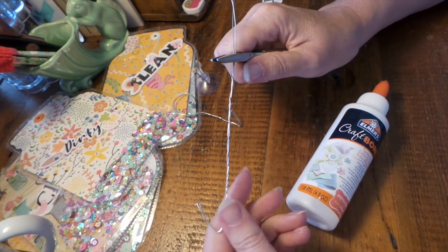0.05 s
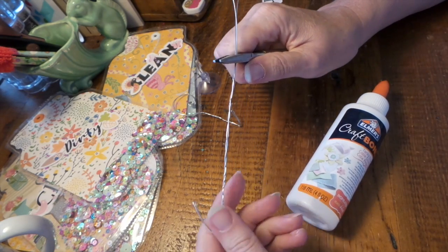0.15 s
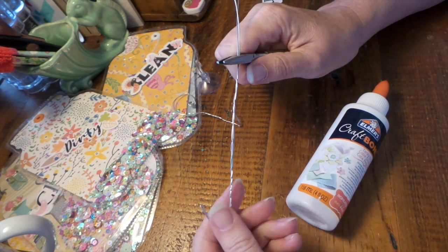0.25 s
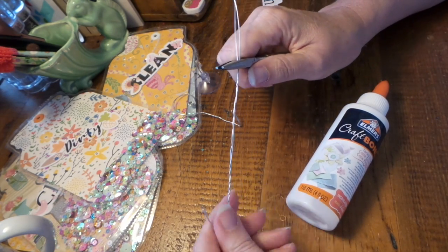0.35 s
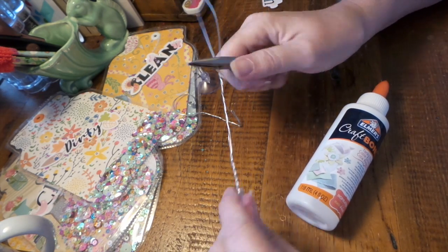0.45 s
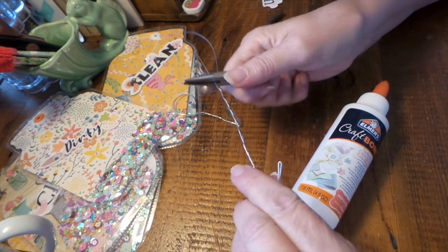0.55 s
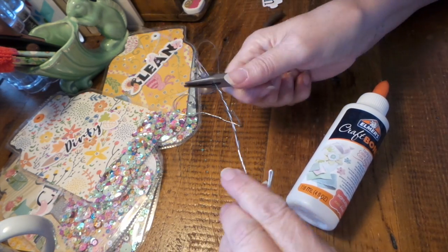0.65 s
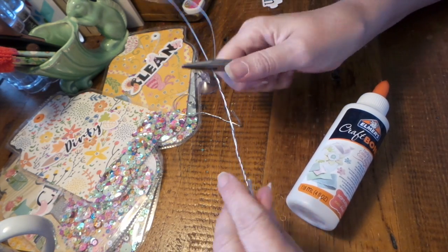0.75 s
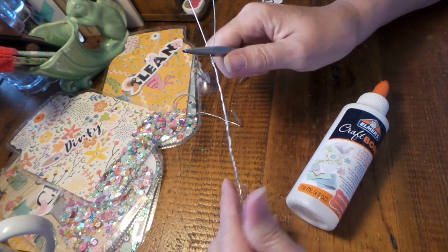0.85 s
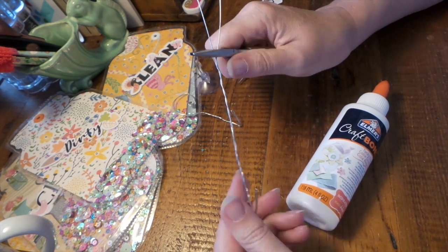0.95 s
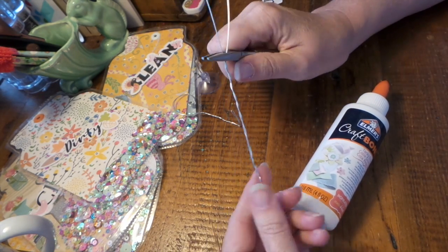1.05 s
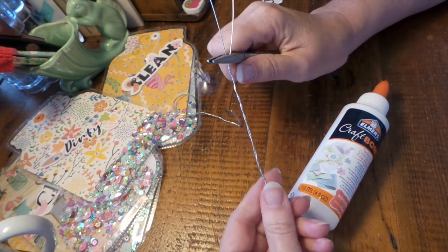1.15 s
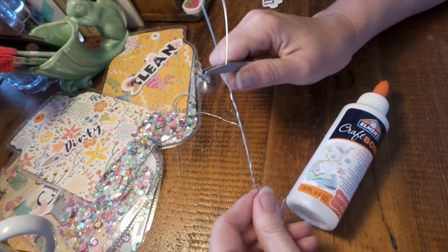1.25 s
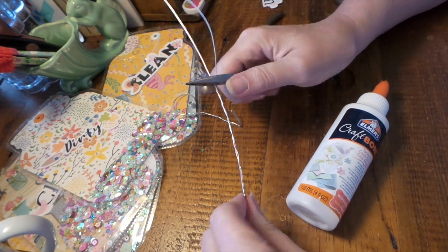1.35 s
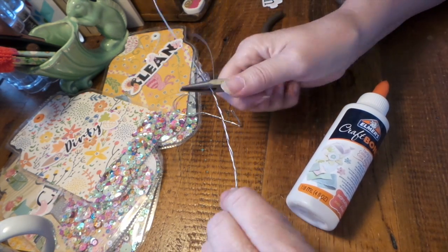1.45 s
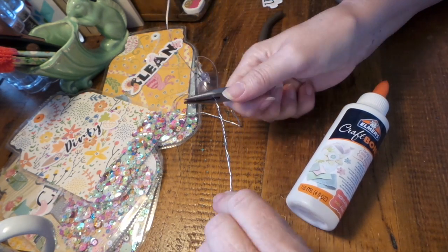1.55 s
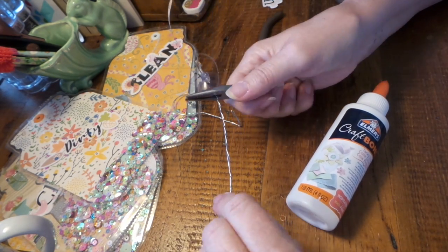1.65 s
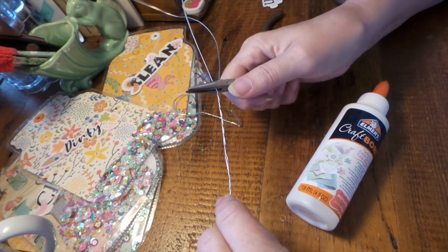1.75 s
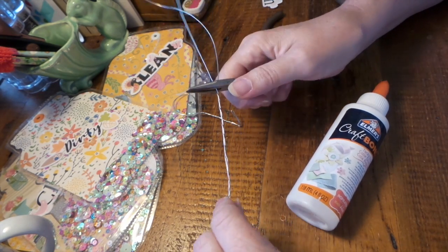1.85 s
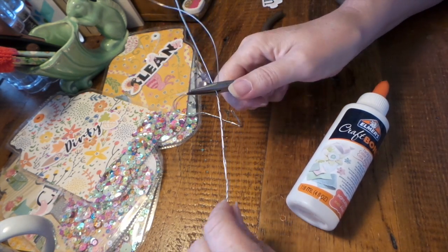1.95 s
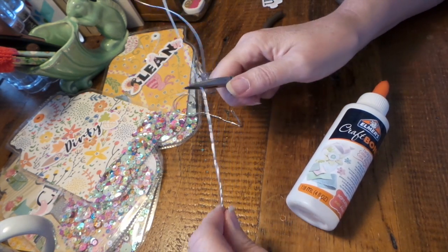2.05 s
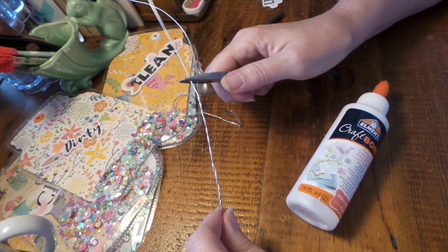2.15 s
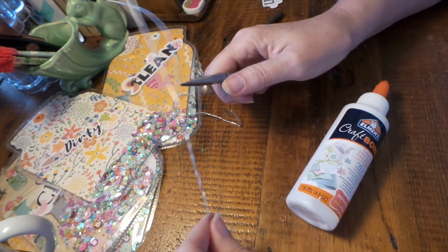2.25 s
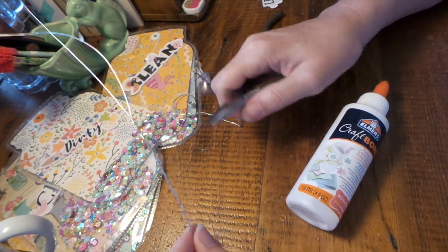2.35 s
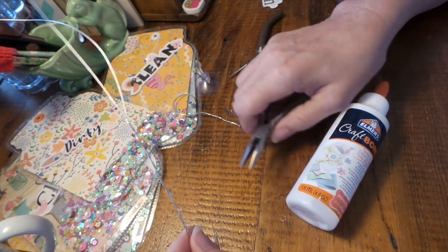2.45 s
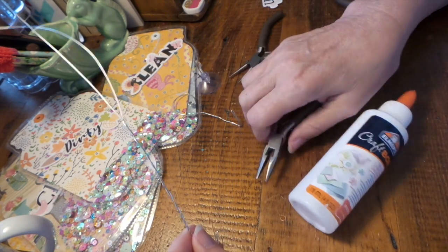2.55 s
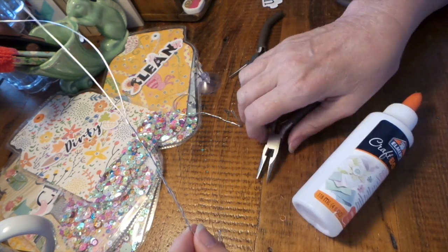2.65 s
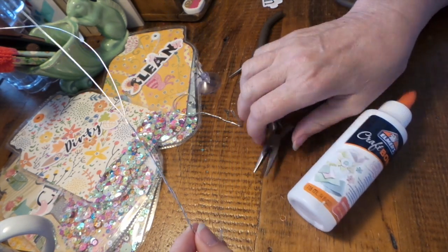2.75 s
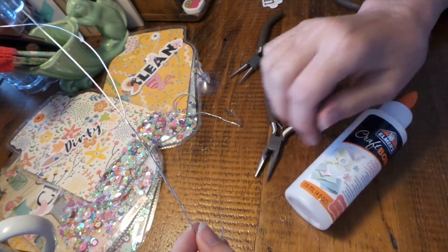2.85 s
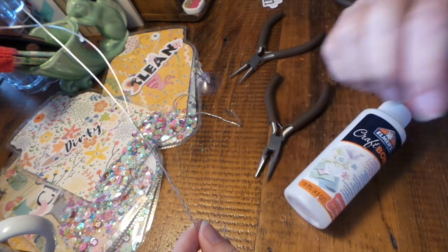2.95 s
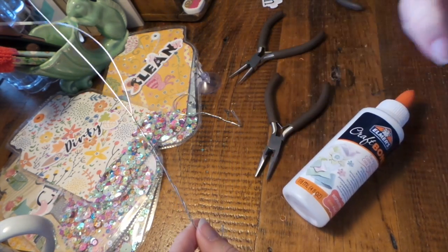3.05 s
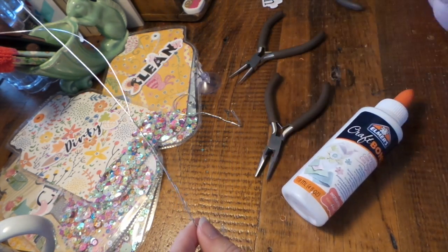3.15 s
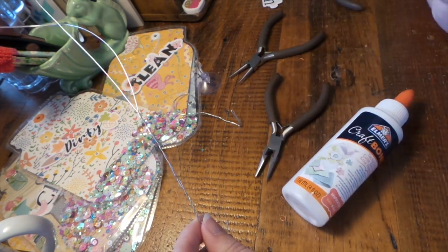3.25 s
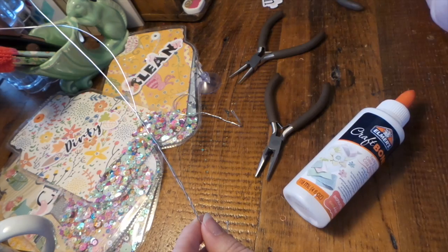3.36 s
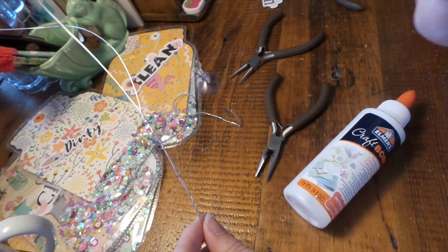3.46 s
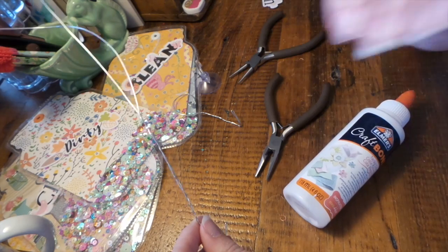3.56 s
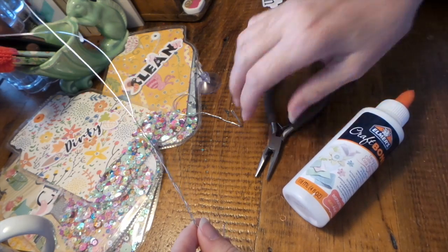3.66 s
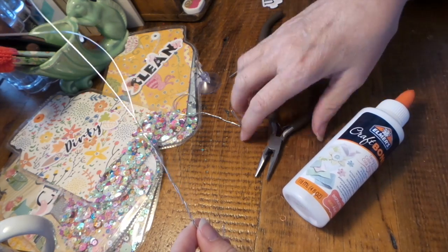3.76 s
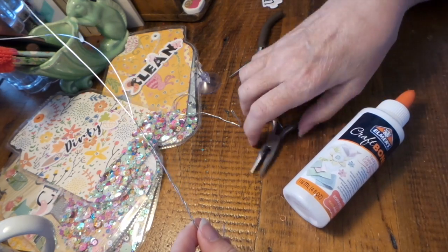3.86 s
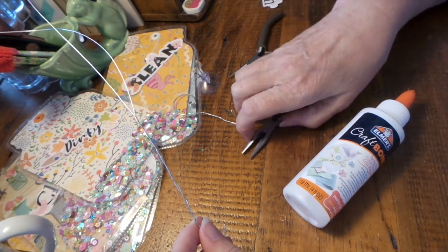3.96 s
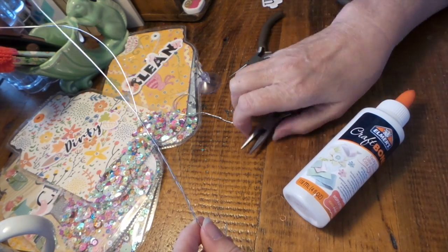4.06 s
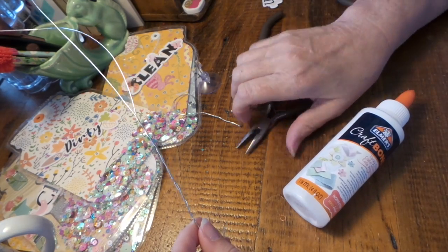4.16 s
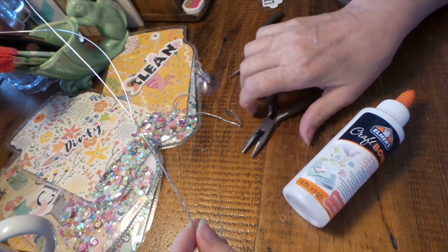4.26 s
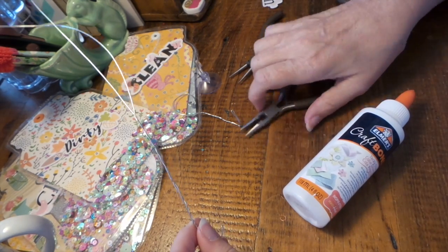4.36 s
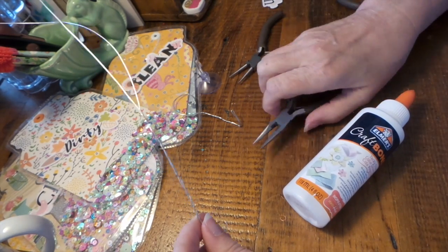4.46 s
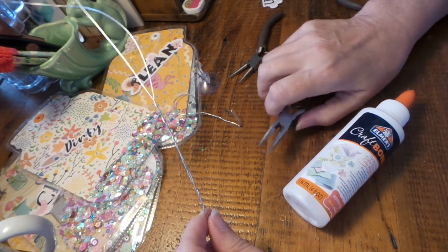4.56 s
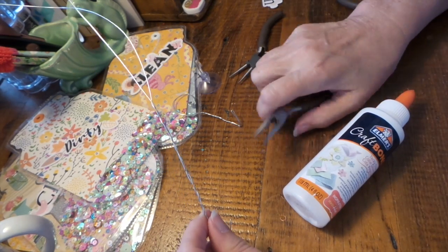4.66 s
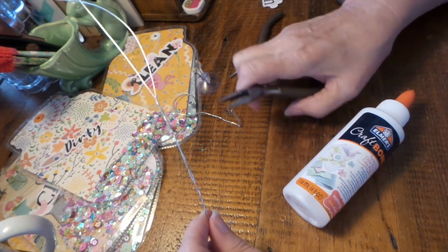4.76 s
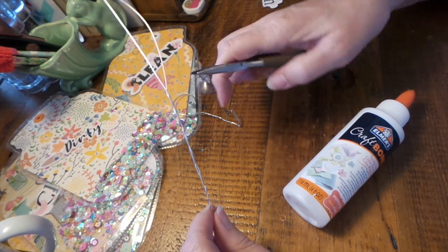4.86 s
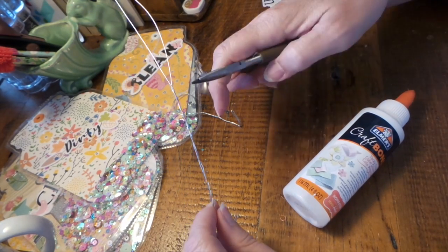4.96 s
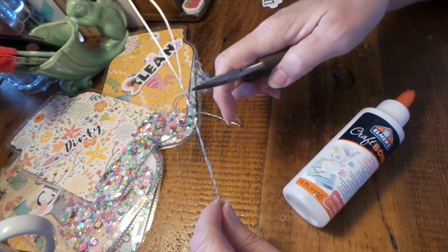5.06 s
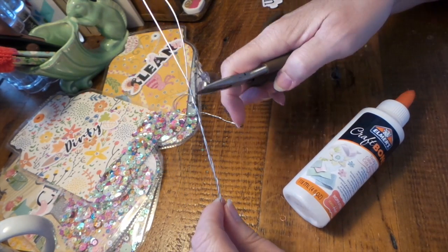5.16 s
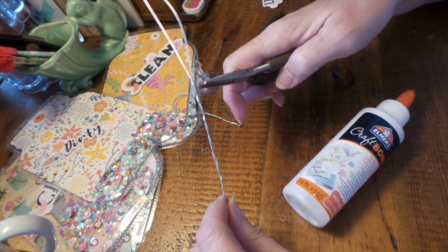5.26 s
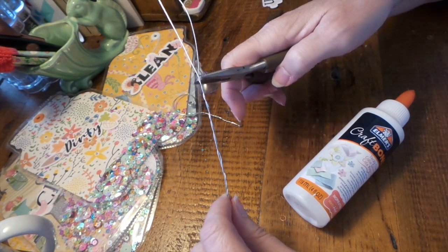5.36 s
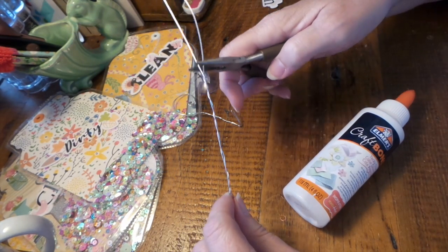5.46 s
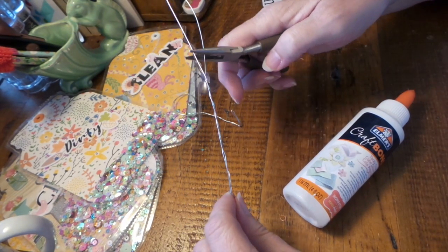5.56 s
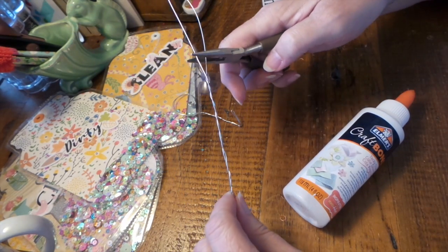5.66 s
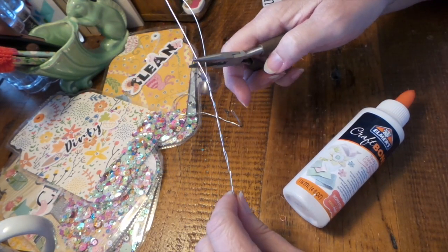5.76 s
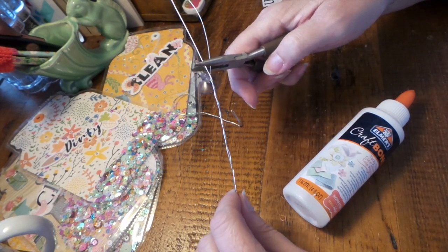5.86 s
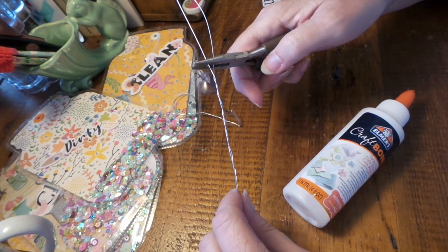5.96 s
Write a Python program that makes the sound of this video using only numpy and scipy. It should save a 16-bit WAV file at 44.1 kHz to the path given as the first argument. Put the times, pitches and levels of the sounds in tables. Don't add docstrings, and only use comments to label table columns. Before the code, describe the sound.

Close, quiet wire snaps and jaw clinks, then pliers drop hard on wood, rattle to rest, and get nudged and lifted again; an appliance hums behind.

```python
import sys
import numpy as np
from scipy import signal
from scipy.fft import rfft, irfft
from scipy.io import wavfile

SR = 44100
rng = np.random.default_rng(int(sys.argv[2]) if len(sys.argv) > 2 else 0)


def makeup_ratio(level_db):
    decades = np.asarray(level_db, float) / 20
    return 10 ** decades


def master_out(mix):
    frames = np.transpose(np.atleast_2d(mix))
    ceiling = np.clip(frames, -1, 1)
    pcm = np.round(ceiling * 32767).astype(np.int16)
    wavfile.write(sys.argv[1], SR, pcm)


N = 265482

# t/s, gain/dB
GAIN = [(0, -1), (.5, -0.5), (1.4, 0.5), (2.2, -1), (2.6, -1.5), (3.1, -1), (3.4, -5), (3.7, -4.5),
        (3.95, 3), (4.2, -2), (4.45, 0), (4.8, -5.5), (5.05, -5.5), (5.25, -3.5), (5.65, -1), (6.02, -3)]
# f/Hz, level/dB, t60/s
JAWS = [(4000, -15, 0.049), (5430, -20, 0.06), (6121, -2.5, 0.065), (6770, -15, 0.092), (8000, -17, .04),
        (9970, -2, 0.077), (9790, -17, 0.078), (11900, 6, 0.035), (12650, -17, 0.056), (12770, 9.5, 0.022),
        (13000, -20, 0.023), (14140, -1, 0.017)]
# f/Hz, level/dB, t60/s
TOP = [(602, 3, 0.056), (707, 4, 0.061), (870, -2.5, 0.025), (1017, -14.5, 0.17), (1022, -2, 0.095),
       (1110, -2, 0.08), (1320, -25, 0.015), (1440, -15, 0.019), (1610, -29, 0.04), (2000, -15, 0.035),
       (2550, -6, 0.018), (3070, -19, 0.053)]
# f/Hz, level/dB, t60/s
PLIERS = [(4150, -2, .02), (6620, -5, .012), (7590, -3, .012), (8500, 0, .01), (10100, -6, .01),
          (12600, -6, .008), (13800, -6, .008)]


def rms_one(x):
    return x / np.sqrt(np.mean(x ** 2) + 1e-20)


def butter(x, hz, kind, order=2):
    return signal.sosfilt(signal.butter(order, hz, kind, fs=SR, output="sos"), x)


def in_time(rows):
    return np.interp(np.arange(N) / SR, *np.transpose(rows))


def noise(response):
    return rms_one(irfft(rfft(rng.standard_normal(N)) * response, N))


def ring(push, modes):
    out = 0
    for k, (hz, level_db, t60) in enumerate(modes):
        radius = makeup_ratio(-60 / (t60 * SR))
        angle = 2 * np.pi * hz / SR
        poles = [1, -2 * radius * np.cos(angle), radius * radius]
        mode = signal.lfilter([0, np.sin(angle)], poles, push + 1e-18)
        out = out + (-1) ** k * makeup_ratio(level_db) * mode
    return out


def place(out, s, sound, peak_db):
    at = round(s * SR)
    sound = sound[:N - at]
    scaled = makeup_ratio(peak_db) * sound / np.max(np.abs(sound))
    return out + np.pad(scaled, (at, N - at - len(sound)))


def contact(length_s, first=-2.33):
    t = np.arange(8192) / SR
    chatter = rng.standard_normal(len(t)) * np.exp(-t / max(length_s, 2e-4))
    chatter[0] = first
    return chatter


def uneven(modes, spread_db=4):
    return [(hz, db + spread_db * rng.standard_normal(), t60) for hz, db, t60 in modes]


def background():
    # f/Hz, density/dB per Hz
    rumble_curve = [(20, -33), (86, -9), (119, -8), (273, -13), (386, -18.5), (701, -23), (2500, -44.5),
                    (3600, -85)]
    # f/Hz, density/dB per Hz
    hiss_curve = [(500, -13.5), (1500, 2), (4000, 0), (8000, -3), (12000, -3), (15000, -3.5), (16500, -15)]
    # f/Hz, width/Hz, rms/dB
    resonances = [(191, 70, -53), (388, 17, -60), (711, 10, -69)]
    gain_db = in_time(GAIN)
    hz = np.maximum(np.fft.rfftfreq(N, 1 / SR), 1)

    def shaped(curve):
        curve_hz, curve_db = np.transpose(curve)
        return noise(makeup_ratio(np.interp(np.log(hz), np.log(curve_hz), curve_db)))

    air = makeup_ratio(-45) * shaped(rumble_curve)
    for mid_hz, width_hz, level_db in resonances:
        air += makeup_ratio(level_db) * noise(1 / (1 + (2 * (hz - mid_hz) / width_hz) ** 2))
    return air * makeup_ratio(gain_db) + shaped(hiss_curve) * makeup_ratio(-59.5 + 0.75 * gain_db)


def appliance_drone():
    # f/Hz, pitch wander/Hz, flutter/dB
    tones = [(118, 7.01, 3.5), (270, 6.88, 4.5)]
    # t/s, level/dB
    load = [(0, -37.5), (.2, -47.5), (.42, -37.5), (.6, -58), (.68, -43), (1.3, -47.5), (1.63, -41),
            (1.8, -58), (1.9, -42), (2.1, -48), (2.27, -44), (2.48, -58), (2.6, -46), (3.05, -48),
            (3.5, -52.5), (4.7, -46), (5, -58), (5.15, -46)]
    levels_db = in_time(load), -49.5 + in_time(GAIN)
    out = 0
    for (mid_hz, wander_hz, flutter_db), level_db in zip(tones, levels_db):
        wander = rms_one(butter(rng.standard_normal(N), 14.34, "low"))
        flutter = rms_one(butter(rng.standard_normal(N), 9.5, "low"))
        flutter = np.clip(flutter, -3, 1.3)
        phase = 2 * np.pi * np.cumsum(mid_hz + wander_hz * wander) / SR
        out = out + np.sqrt(2) * makeup_ratio(level_db + flutter_db * flutter) * np.sin(phase)
    return out


def room(x):
    t60_s, level_db, dull_hz = 0.3, -12.5, 3000
    t = np.arange(SR // 2) / SR
    dull, bright = rng.standard_normal((2, len(t)))
    tail = butter(dull, dull_hz, "low") * makeup_ratio(-60 * t / t60_s)
    tail += 0.93 * bright * makeup_ratio(-60 * t / (.5 * t60_s))
    tail *= 1 - np.exp(-t / 0.0031)
    return makeup_ratio(level_db) * signal.fftconvolve(x, tail / np.sqrt(np.sum(tail ** 2)))[:N]


def knocks(rows, top_hz=17000):
    # f/Hz, level/dB, t60/s
    board = [(118, 2, 0.068), (160, 1.5, 0.065), (253, 2, 0.091), (276.5, 8, 0.041), (375.6, -5.5, 0.046),
             (443, 1, 0.071), (526, -9, 0.087)]
    out, touch = np.zeros(N), -signal.unit_impulse(8192)
    for s, thud_db, thud_hz, knock_db, knock_hz, crack_db in rows:
        thud = ring(touch, [(thud_hz, 0, 3.36 / thud_hz)])
        thud += 0.11 * ring(touch, uneven(board))
        out = place(out, s, thud, thud_db)
        knock = ring(touch, [(knock_hz, 0, 5.5 / knock_hz)])
        knock += 0.088 * ring(touch, uneven(TOP))
        rattle = butter(contact(0.0065), [.5 * knock_hz, 1.54 * knock_hz], "band")
        out = place(out, s, knock + 1.29 * rattle, knock_db)
        push = contact(0.0037)
        crack = butter(push, [3000, top_hz], "band") + 0.015 * ring(push, PLIERS)
        out = place(out, s, crack, crack_db)
    return out


def light_taps():
    # t/s, knock/dB, knock f/Hz, crack/dB
    taps = [(0.031, -35, 1120, -44), (0.258, -40.5, 820, -53), (0.44, -38, 884, -57), (0.91, -36, 900, -54),
            (1.802, -37, 1000, -47), (1.951, -43, 1200, -50), (2.213, -39, 810, -60),
            (3.099, -41, 1040, -41.5), (3.118, -38.5, 1010, -51), (3.2, -42.5, 1280, -46),
            (3.236, -38, 1180, -61), (3.252, -34.5, 1200, -60), (3.297, -61, 1240, -55),
            (3.432, -29, 1600, -38), (3.565, -41.5, 800, -62), (3.6322, -26, 1270, -34),
            (3.744, -22.5, 800, -66), (4.4082, -37, 1290, -37), (4.526, -37.5, 1360, -43),
            (4.56, -41, 1460, -53), (4.779, -51, 1100, -50.5), (5.352, -34.5, 1080, -59),
            (5.011, -43.5, 1100, -56), (5.33, -43, 1200, -58), (5.604, -46.5, 2600, -46),
            (5.665, -41.5, 1300, -53)]
    thud_hz, thud_db = 280, -15
    rows = [(s, db + thud_db, thud_hz, db, hz, crack_db) for s, db, hz, crack_db in taps]
    return knocks(rows, top_hz=8000)


def blows(rows, thud_hz, knock_hz, sag_per_s=0):
    pitched = []
    for s, thud_db, knock_db, crack_db in rows:
        sag = np.exp(-sag_per_s * (s - rows[0][0]))
        pitched.append((s, thud_db, thud_hz * sag, knock_db, knock_hz * sag, crack_db))
    return knocks(pitched)


def pliers_on_table():
    # t/s, thud/dB, knock/dB, crack/dB
    drop = [(2.7762, -8, -20, -6), (2.82, -26, -19.5, -17), (2.8333, -6.5, 0, -8), (2.838, -18, -38, -13),
            (2.848, -5, -4, -12.5), (2.8495, -3, -35, -27), (2.8635, -18, -30, -28), (2.875, -28, -8, -15),
            (2.895, -40, -41, -25), (2.9105, -3, -28, -17), (2.9155, -17, -10, -35),
            (2.94, -25, -20.5, -27), (2.9515, -7.5, -30, -18.5), (2.968, -40, -16.5, -20),
            (2.982, -44, -32, -25)]
    # t/s, thud/dB, knock/dB, crack/dB
    landing = [
        (3.8163, -5.5, -19.5, -16),
        (3.8255, -11, -15, -17.5),
        (3.856, -37, -26, -27.5),
        (3.952, -20, -28.5, -41),
    ]
    # t/s, thud/dB, knock/dB, crack/dB
    pickup = [
        (4.0385, -6, -6, -9.5),
        (4.0595, -13.5, -16, -14),
        (4.071, -36, -25, -23),
        (4.252, -10.5, -7.5, -9),
        (4.27, -19.5, -14, -42),
        (4.31, -26, -17.5, -21),
        (4.3145, -12, -15.5, -15.5),
        (4.33, -23, -42, -24),
        (4.45, -27, -37, -58),
    ]
    out = blows(drop, thud_hz=367, knock_hz=1180, sag_per_s=1.72)
    out += blows(landing, thud_hz=270, knock_hz=1000)
    return out + blows(pickup, thud_hz=294, knock_hz=1320)


def sway_and_clank():
    # t/s, level/dB, f/Hz, t60/s
    rings = [(2.836, -19, 118, 0.14), (2.95, -27, 118, 0.41), (3.824, -13.5, 118, 0.14),
             (2.778, -11, 2000, 0.0065), (2.911, -34.5, 4170, 0.057), (2.942, -34, 4170, .05),
             (2.969, -39, 4360, 0.039), (4.038, -11, 3000, 0.011), (4.041, -11, 4200, 0.0068),
             (4.06, -9.5, 2500, 0.0094), (4.2519, -1, 1480, 0.0085), (4.253, -15, 1060, 0.026),
             (4.315, -10.5, 2450, 0.0067)]
    out, touch = np.zeros(N), -signal.unit_impulse(8192)
    for s, ring_db, ring_hz, t60 in rings:
        soft_touch = butter(touch, 2 * ring_hz, "low")
        out = place(out, s, ring(soft_touch, [(ring_hz, 0, t60)]), ring_db)
    return out


def scrapes(strokes, body, low_hz, shift=0.036, uneven_db=3, bright_db=-30, top_hz=19000):
    out = np.zeros(N)
    for s, length_s, crest, hiss_db, ring_db in strokes:
        at, n = round(s * SR), round(length_s * SR)
        slips = rng.standard_normal(16384) * makeup_ratio(2.1 * np.minimum(rng.exponential(1, 16384), 6))
        slips *= makeup_ratio(2.03 * rms_one(butter(rng.standard_normal(16384), 100, "low")))
        grip = rng.standard_normal((len(body), 2))
        modes = [(hz * (1 + shift * a), db + uneven_db * b, t60) for (hz, db, t60), (a, b) in zip(body, grip)]
        stroke = np.interp(np.linspace(0, 1, n), [0, np.clip(crest, .02, .98), 1], [0, 1, 0])
        stroke = stroke ** 1.2
        hiss = butter(butter(slips, low_hz, "high", order=3), top_hz, "low")
        hiss = rms_one(hiss + makeup_ratio(bright_db) * butter(hiss, 9000, "high"))
        rub = makeup_ratio(hiss_db) * hiss + makeup_ratio(ring_db) * rms_one(ring(slips, modes))
        out[at:at + n] += stroke * rub[2000:2000 + n]
    return out


def table_rubs():
    # t/s, length/s, moment of most pressure/0-1, hiss/dB, ring/dB
    slides = [(2.73, .016, .41, -62, -66), (2.83, 0.089, .2, -37, -47), (2.89, 0.12, 0.13, -41, -36),
              (3.82, 0.29, 0.22, -45.5, -68), (3.91, 0.041, 0.59, -29.5, -34.5),
              (4.04, 0.073, 0.24, -42, -50), (4.255, 0.075, .17, -41, -38),
              (4.305, 0.048, 0.37, -34.5, -36), (4.07, 0.21, .05, -54, -68), (4.35, 0.32, .05, -54, -71)]
    # t/s, length/s, moment of most pressure/0-1, hiss/dB, ring/dB
    chatters = [(2.834, 0.078, 0.32, -42, -22), (2.91, 0.12, 0, -44, -30), (3.90, 0.073, 0.35, -37.5, -37),
                (4.04, 0.057, 0.23, -28.5, -33), (4.254, 0.056, .1, -29, -26), (4.31, 0.056, 0, -41, -33),
                (3.18, .15, 0.02, -77, -56), (4.38, .31, 0, -68, -50.5), (5.32, 0.13, 0.4, -62, -67)]
    pressed_top = [(hz, db, t60 / 5) for hz, db, t60 in TOP]
    out = scrapes(slides, PLIERS, low_hz=2000, shift=0.034)
    return out + scrapes(chatters, pressed_top, low_hz=900, shift=0.086, uneven_db=1.5, top_hz=3000)


def jaw_clinks():
    # t/s, peak/dB
    clinks = [
        (0.621, -30.5),
        (0.729, -29),
        (0.8637, -15.5),
        (5.5994, -43),
        (5.67, -41),
    ]
    out = np.zeros(N)
    for s, peak_db in clinks:
        push = contact(0.00024, first=-4.0)
        out = place(out, s, ring(push, JAWS) + 1.5 * butter(push, 9000, "high"), peak_db)
    return out


def wire_ticks():
    # t/s, crack/dB, low part/dB, contact length/s, rustle/dB
    snaps = [(0.7513, -29, -29.5, 0.00035, -22.5), (0.754, -53, -39, 0.00067, -54),
             (1.2, -52, -39, 0.0046, -29.5), (1.619, -15, -27, 0.0003, -31),
             (1.645, -23.5, -34.5, 0.0019, -30), (2.121, -33.5, -59, 0.00087, -45),
             (2.577, -45, -47, .001, -48), (2.66, -40, -40.5, 0.005, -61), (2.702, -44, -53, 0.0017, -36.5),
             (3.91, -33, -55, .001, -54), (3.94, -43, -29, 0.0032, -47), (3.97, -35, -50, .001, -56),
             (4.017, -28, -39, .002, -56)]
    out = np.zeros(N)
    for s, crack_db, low_db, length_s, rustle_db in snaps:
        push = contact(length_s)
        out = place(out, s, butter(push, 2500, "high"), crack_db)
        out = place(out, s, butter(push, [1100, 3200], "band"), low_db)
        out = place(out, s, butter(contact(0.0059, first=0), 930, "high"), rustle_db)
    return out


def wire_scrapes():
    # t/s, length/s, moment of most pressure/0-1, hiss/dB, ring/dB
    on_jaws = [(.53, 0.052, 0.25, -46, -57), (.62, 0.032, 0.2, -46, -63), (.72, 0.045, .26, -48, -56)]
    drawn = [(.95, 0.18, 0.59, -51, -56.5), (1.13, 0.11, 0.037, -43.5, -55), (1.205, 0.071, 0.35, -35, -45),
             (1.32, 0.058, .5, -51, -53), (1.347, 0.022, 0.5, -29, -52)]
    held = [(2.08, .047, 0.23, -63, -51), (2.145, .066, 0.25, -50, -45.5), (2.225, 0.084, 0.48, -55, -57.5),
            (2.29, 0.042, 0.61, -54, -55), (2.328, 0.029, 0.26, -51, -49.5)]
    # f/Hz, level/dB, t60/s
    free_wire = [(4700, 0, .004), (5200, 8, 0.005), (5800, 2, .004)]
    # f/Hz, level/dB, t60/s
    held_wire = [(3180, 0, 0.034), (3510, -1, 0.033), (3840, -4, 0.033), (5460, -17, .02), (6530, -1, .02),
                 (8000, -7, 0.013), (8550, 10, 0.01), (9600, -2, .02), (11700, 6.5, 0.014),
                 (12500, 2, .008), (13300, 8, .01)]
    out = scrapes(on_jaws, JAWS[4:], low_hz=8750, shift=0.033)
    out += scrapes(drawn, free_wire, low_hz=1300, bright_db=-3.5)
    return out + scrapes(held, held_wire, low_hz=5030, shift=0.022)


def scene():
    steady = background() + appliance_drone()
    near = light_taps() + pliers_on_table() + sway_and_clank() + table_rubs()
    near += jaw_clinks() + wire_ticks() + wire_scrapes()
    near = butter(near, 123.4, "high", order=4)
    return (near + room(near) + steady)[None]


def band_limit(x):
    return signal.sosfilt(signal.butter(12, 16850, fs=SR, output="sos"), x)


def record(dry):
    ceiling, cutoff_hz = 1.05, 16100
    rounded = ceiling * np.tanh(dry / ceiling)
    top_cut = signal.cheby2(12, 30, cutoff_hz, fs=SR, output="sos")
    return band_limit(signal.sosfilt(top_cut, rounded))


dry = scene()
out = record(dry)
master_out(out)
```